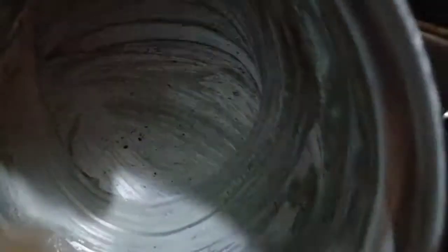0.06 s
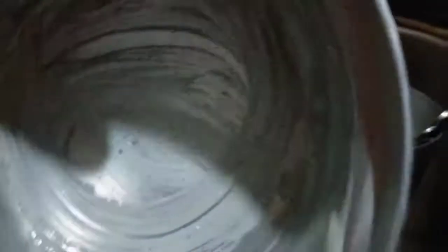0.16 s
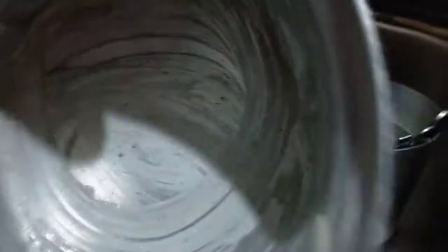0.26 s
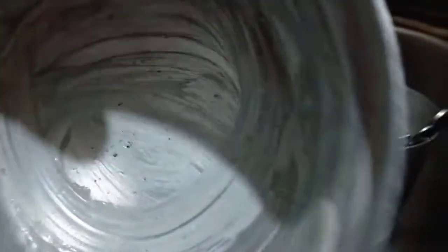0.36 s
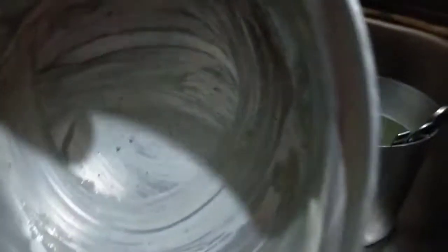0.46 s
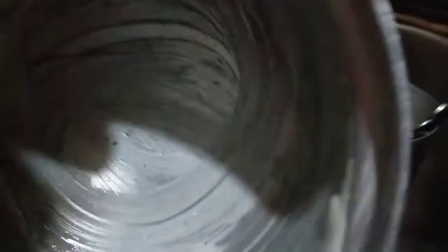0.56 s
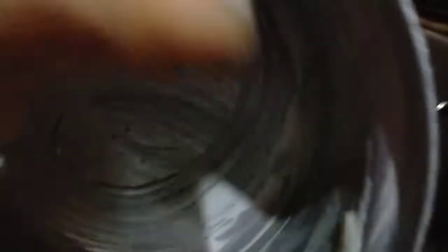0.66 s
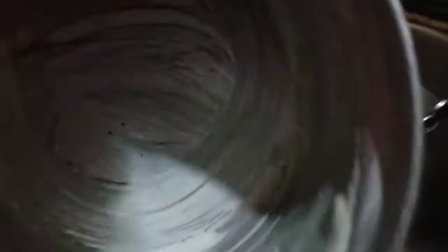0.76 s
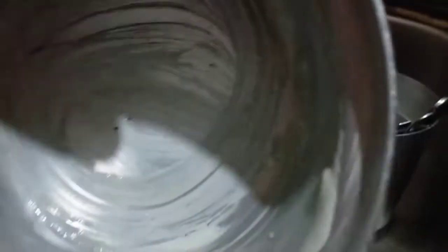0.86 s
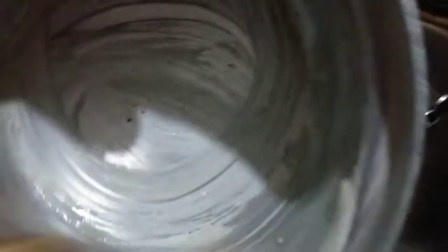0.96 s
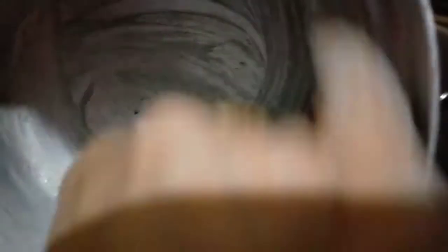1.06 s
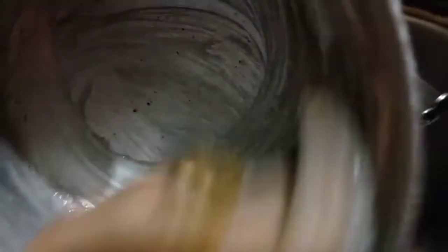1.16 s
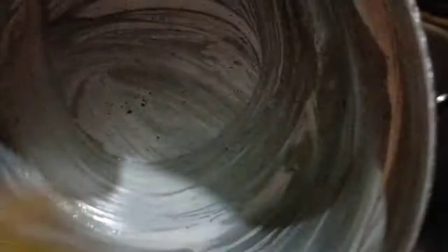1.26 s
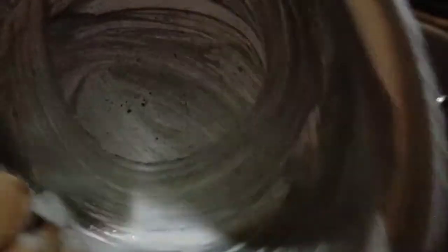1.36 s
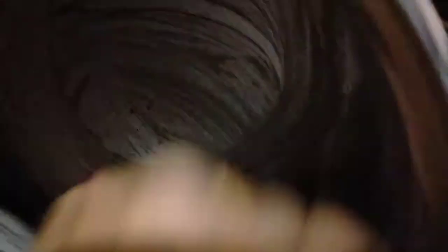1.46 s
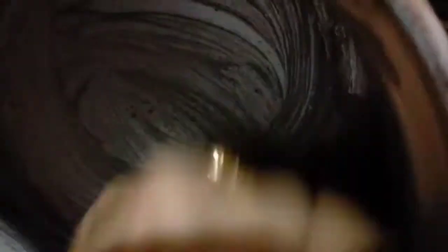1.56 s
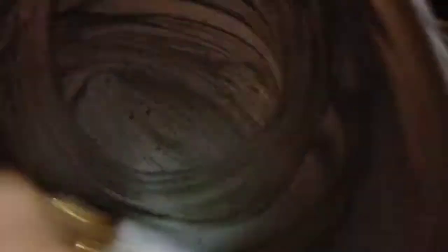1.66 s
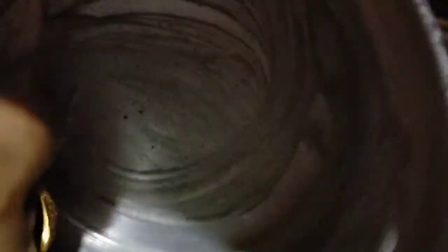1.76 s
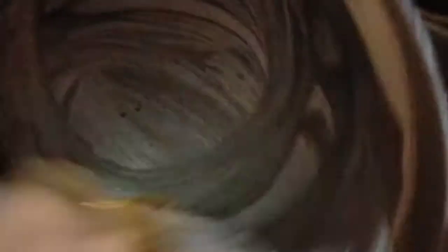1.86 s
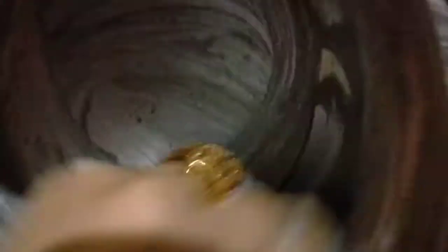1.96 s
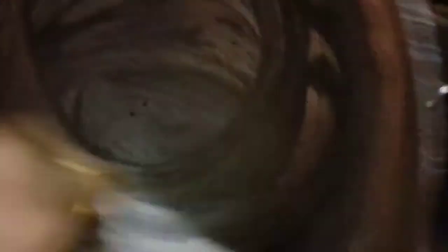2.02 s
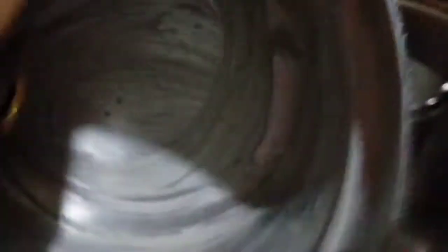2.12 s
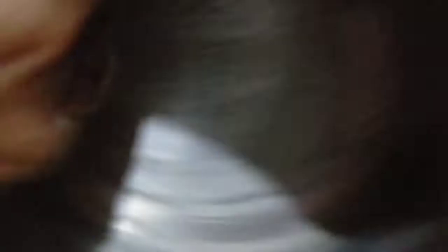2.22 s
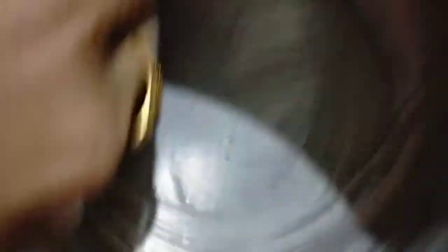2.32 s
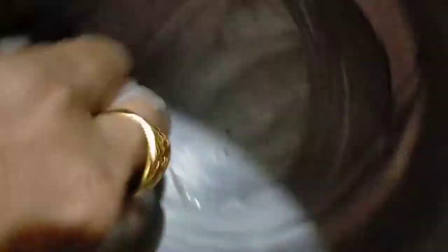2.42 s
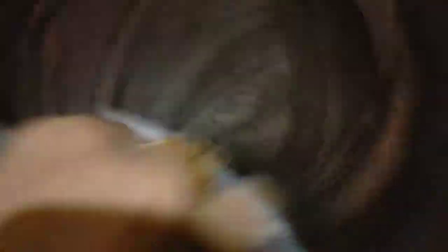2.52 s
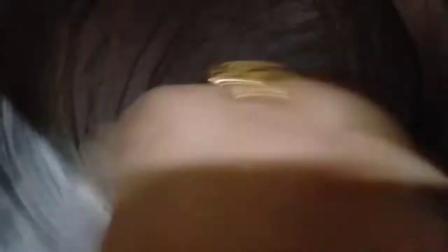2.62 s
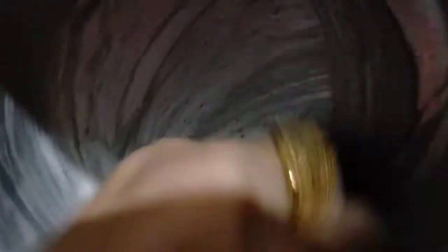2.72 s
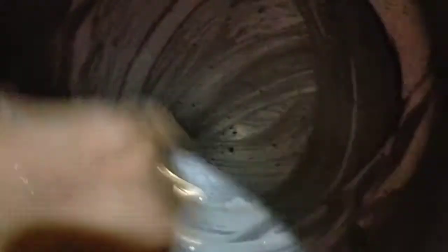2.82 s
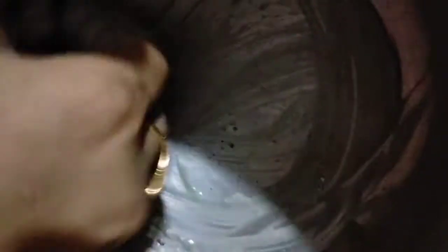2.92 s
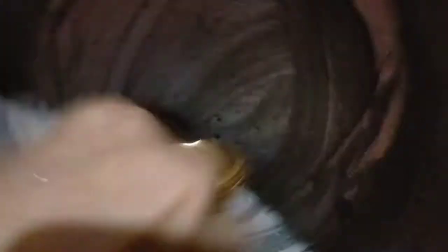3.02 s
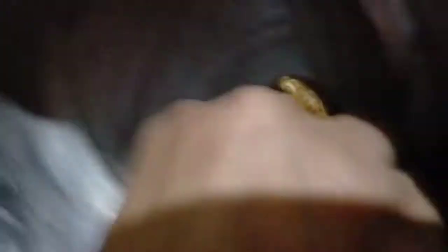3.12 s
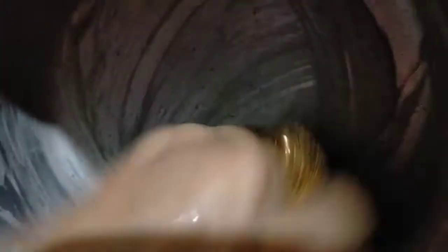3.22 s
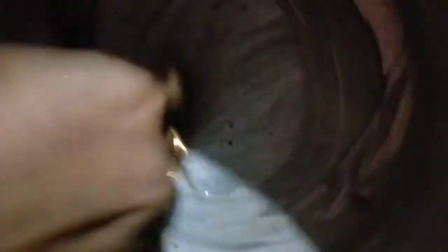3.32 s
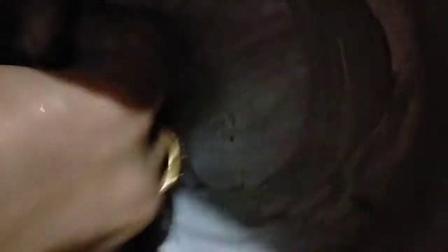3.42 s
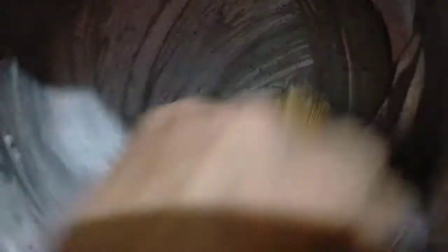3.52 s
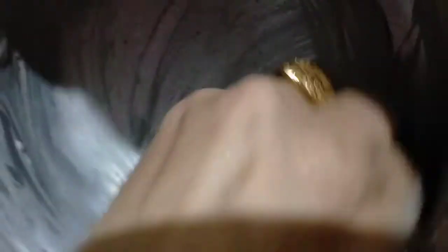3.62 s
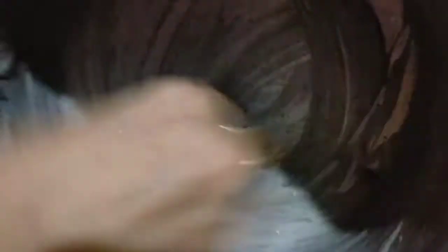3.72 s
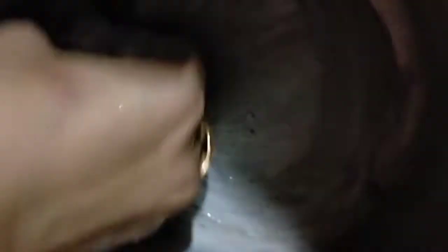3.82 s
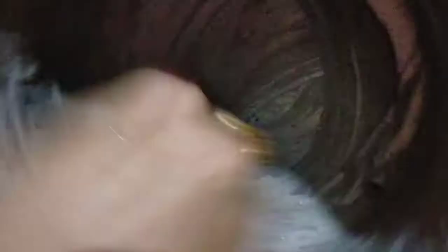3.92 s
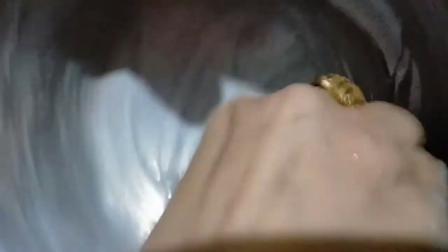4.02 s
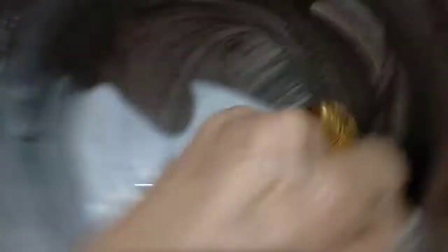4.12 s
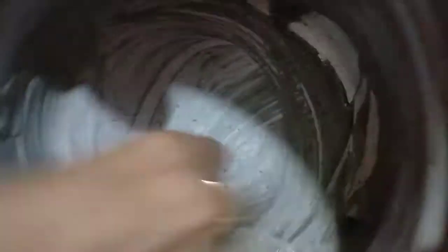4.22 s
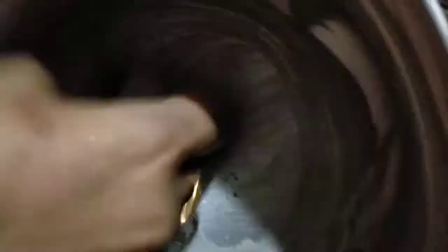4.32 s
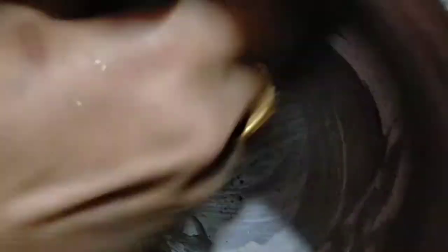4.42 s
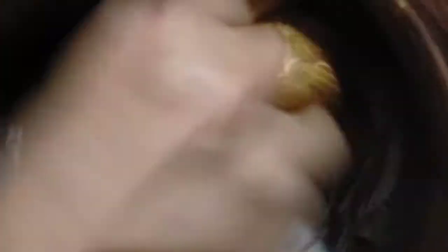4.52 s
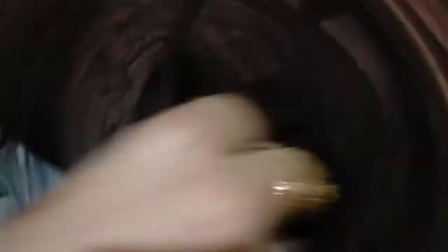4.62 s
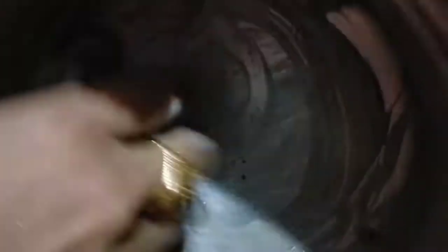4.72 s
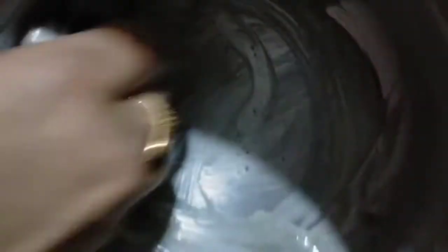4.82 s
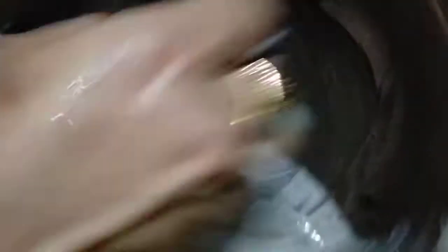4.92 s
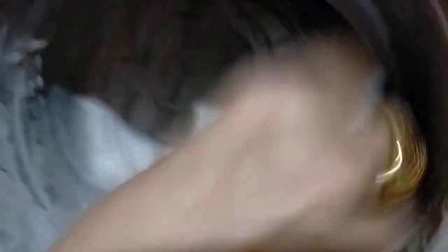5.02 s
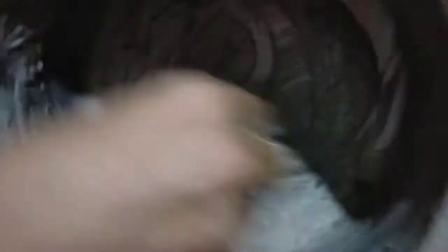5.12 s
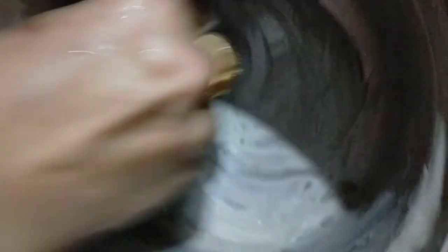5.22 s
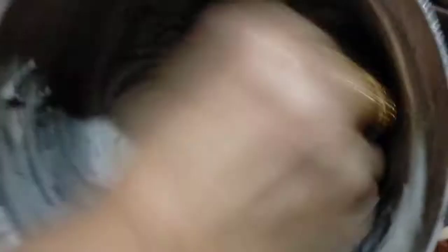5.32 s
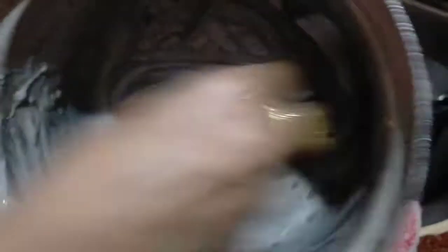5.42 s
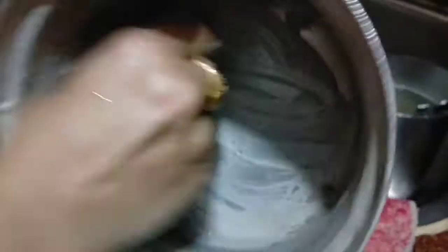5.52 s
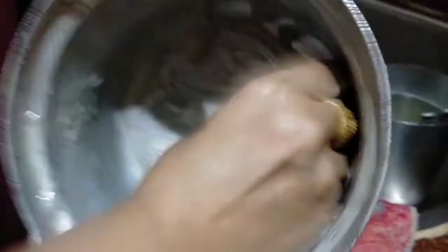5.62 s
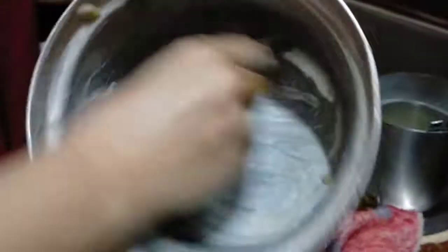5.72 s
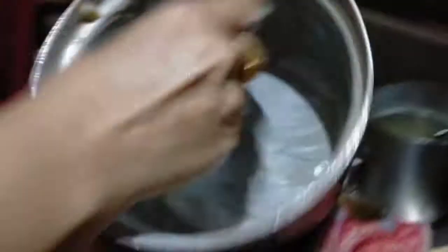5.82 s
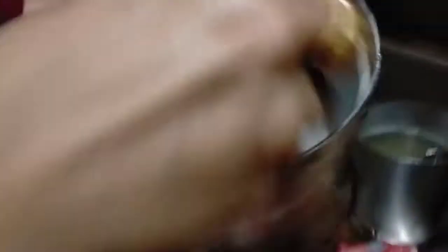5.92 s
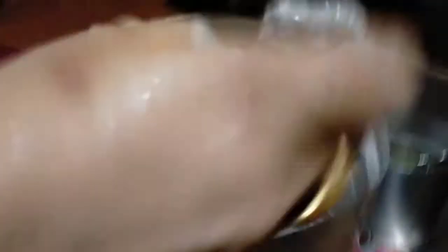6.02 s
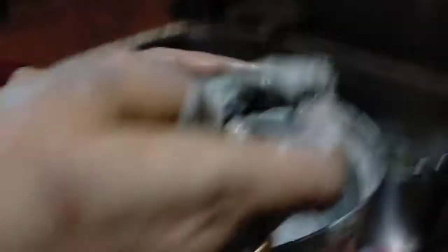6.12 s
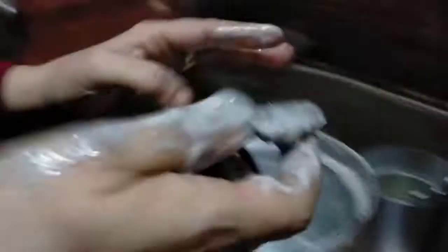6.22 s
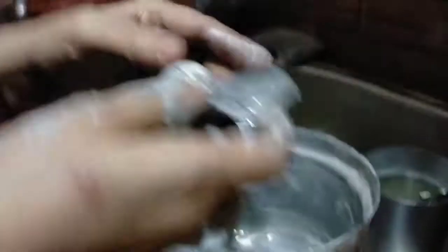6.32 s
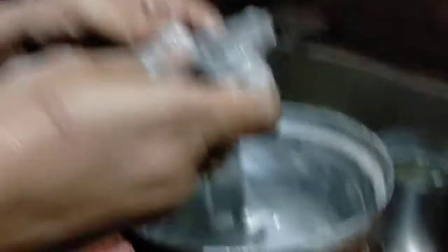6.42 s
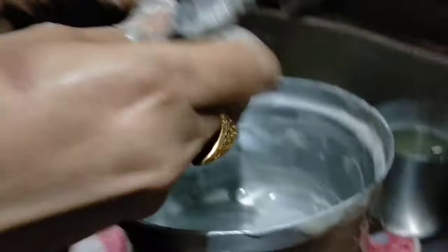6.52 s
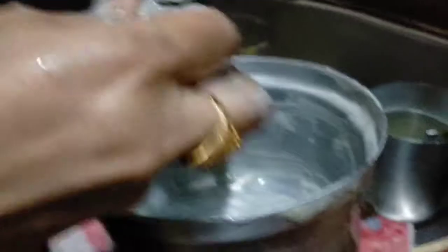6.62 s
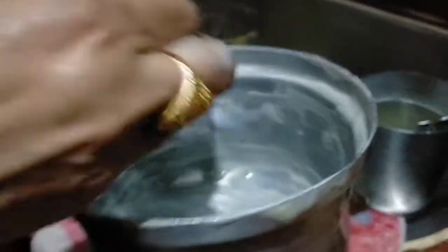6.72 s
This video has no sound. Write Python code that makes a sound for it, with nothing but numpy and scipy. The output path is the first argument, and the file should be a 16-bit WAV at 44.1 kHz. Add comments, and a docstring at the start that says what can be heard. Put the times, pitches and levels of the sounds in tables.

```python
"""In a small, hard kitchen, a soapy steel-wool pad scours the inside of a metal pot close by, stroke on stroke.
Countless wire tips catch and slip: random clicks that hiss and drive the wall, the base and the air in the pot.
On the way the pot clinks, knocks and bumps, made of short decaying tones, scrapes and rumble.
Near the end the pad is lifted out with faint crackles and wet smacks, and a low kitchen hum remains."""
import sys
import numpy as np
from scipy import signal
from scipy.fft import rfft, irfft, next_fast_len
from scipy.io import wavfile
from scipy.ndimage import uniform_filter1d, map_coordinates

SR = 44100
rng = np.random.default_rng(int(sys.argv[2]) if len(sys.argv) > 2 else 0)


def store_wav(level_fs):
    """Save 16-bit WAV to argv[1]."""
    pcm = np.round(np.clip(np.atleast_2d(level_fs), -1, 1) * 32767)
    wavfile.write(sys.argv[1], SR, pcm.T.astype(np.int16))


N = 298539

# colour of the wires' sound: (frequency [Hz], relative level [dB per Hz])
WIRE_COLOUR = [(2600, -35), (4300, -6.5), (4900, -11), (5800, -7), (6500, -4.5), (7300, -3), (8400, 0.5),
               (10000, -0.5), (11000, -6), (12100, -6), (13200, -4), (15200, 1.5), (15800, -6.5)]


def amp(db):
    """Turn decibels into a gain."""
    return 10 ** (np.asarray(db) / 20)


def unit(x):
    """Scale a sound to rms 1."""
    return x / np.sqrt(np.mean(x ** 2) + 1e-20)


def curves(rows):
    """Join the rows with straight lines: one value per sample for each column after the time."""
    s, *cols = np.transpose(rows)
    return [np.interp(np.arange(N) / SR, s, c) for c in cols]


def wobble(rate):
    """A smooth random curve through `rate` random points a second."""
    points = rng.standard_normal(int(N * rate / SR) + 4)
    return map_coordinates(points, [np.arange(N) * rate / SR])


def filtered(x, response):
    """Multiply the spectrum of x by a response that depends on frequency."""
    m = next_fast_len(N + SR // 2)
    hz = np.fft.rfftfreq(m, 1 / SR)
    return irfft(rfft(x, m) * response(hz), m)[..., :N]


def coloured(x, points):
    """Shape x with a filter that never acts ahead of time, from (Hz, dB) points; the result has rms 1."""
    f, db = np.transpose(points)
    hz = np.fft.rfftfreq(SR // 10, 1 / SR)
    gain = amp(np.interp(np.log(hz + 1), np.log(f), db))
    # folding the cepstrum gives the minimum-phase filter with this gain
    cepstrum = irfft(np.log(gain))
    half = len(cepstrum) // 2
    cepstrum[1:half] *= 2
    cepstrum[half + 1:] = 0
    impulse = irfft(np.exp(rfft(cepstrum)))
    return unit(signal.fftconvolve(x, impulse)[:N])


def resonance(hz, centre_hz, width_hz):
    """Response of one mode, which rings at its centre and dies sooner the wider it is."""
    return 1j * hz * width_hz / (centre_hz ** 2 - hz ** 2 + 1j * hz * width_hz)


def soft(hz, edge_hz, order):
    """Gain of a smooth low-pass, one half at the edge."""
    return 1 / (1 + (hz / edge_hz) ** order)


def fade(t, t60):
    """Exponential decay, 60 dB down at t60 seconds."""
    return np.exp(-np.log(1000) * t / t60)


def add(track, s, sound):
    """Mix a sound into a track at s seconds."""
    part = track[round(s * SR):][:len(sound)]
    part += sound[:len(part)]


def echoes(x, t60, hop_count=2048):
    """A dense tail of about the energy of x; the moving hand keeps changing its pattern."""
    t = np.arange(int(SR * min(t60, .5)) + 64) / SR
    window = signal.get_window("hann", 2 * hop_count)
    padded, out = np.pad(x, (0, 2 * hop_count)), np.zeros(N)
    # overlapping slices of x, each with a fresh random tail
    for start in range(0, N, hop_count):
        piece = padded[start:][:len(window)] * window
        tail = rng.standard_normal(SR)[:len(t)] * fade(t, t60) * (t > 0)
        add(out, start / SR, signal.fftconvolve(piece, tail / np.linalg.norm(tail)))
    return out


def in_pot(x, wet_db, t60):
    """Sound bounces round inside the pot: echoes join the direct sound, at rms 1."""
    return unit(x + amp(wet_db) * echoes(x, t60))


def slips(rate, spread_db, clump_db):
    """Wire tips let go at random, rate a second; tangles of wire let go in clumps."""
    happens = rng.random(N) < rate / SR
    size = rng.standard_normal(N) * amp(spread_db * rng.standard_normal(N))
    clumps = amp(clump_db * wobble(260))
    # the root of the rate keeps dense slips from growing louder than sparse ones
    return unit(happens * size / np.sqrt(rate) * clumps)


def arc(s, length):
    """Progress 0-1 through a stroke, and the pad's speed: from rest, over a peak, back to rest."""
    u = np.clip((np.arange(N) / SR - s) / length, 0, 1)
    moving = (u > 0) & (u < 1)
    return u, np.abs(np.sin(np.pi * u)) * moving


def stroke_gains():
    """Gains of hiss, wall and hollow: each swells with speed and pressure, and drags on through the turns."""
    # pushes of the pad: (start [s], length [s], wire hiss before its trim [dB],
    # rise of pressure from start to end [dB], wall ring over the hiss [dB],
    # hollow over the hiss before their trims [dB])
    strokes = [(-0.028, 0.12, -36.5, -4.5, -7, -11.5), (0.101, 0.16, -34, 1.5, -9, -16),
               (0.246, 0.2, -35.5, 4, -7.5, -13.5), (0.504, 0.18, -33.5, -9, -8, -13),
               (0.623, 0.16, -37.5, 12, -6, -13.5), (0.806, 0.41, -35.5, -1, -8, -16),
               (1.098, 0.11, -40.5, -1, 0, -10.5), (1.224, 0.16, -34, 4, -5.5, -10),
               (1.424, 0.17, -34.5, -1, -3, -12.5), (1.592, 0.23, -33, 1.5, -7, -12.5),
               (1.843, 0.14, -35.5, -1.5, -1, -11), (2.01, 0.31, -39.5, -10.5, -6.5, -10),
               (2.394, 0.16, -45.5, -6, -4, -9), (2.517, 0.2, -39.5, -5.5, -6.5, -12.5),
               (2.727, 0.24, -37, 4, -5, -11.5), (2.981, 0.092, -43.5, -7, 4.5, -7.5),
               (3.002, 0.2, -37.5, 1.5, -6, -11.5), (3.228, 0.2, -36, 9.5, -4.5, -12),
               (3.477, 0.21, -36, 0, -4.5, -13), (3.706, 0.2, -33.5, 8, -5, -13.5),
               (3.929, 0.2, -37, 7, -1, -13.5), (4.135, 0.24, -39, 14.5, -4.5, -9),
               (4.263, 0.36, -39.5, -4, -3.5, -11.5), (4.658, 0.044, -51, 3, -4, -20),
               (4.728, 0.056, -39.5, -10, -10.5, -21), (4.79, 0.2, -45, -5.5, -0.5, -12.5),
               (5.069, 0.23, -35.5, 5.5, -4, -15), (5.287, 0.15, -32.5, -4.5, -6.5, -20),
               (5.473, 0.097, -28.5, -10, -7, -18.5), (5.601, 0.11, -31, 2.5, -7.5, -17.5),
               (5.727, 0.11, -32.5, -4.5, -3, -15.5)]
    # how the layers grow with the pad's speed: (power for hiss, for wall ring, for hollow)
    speed_law = (0.66, 0.36, 0.3)
    drag_db, drag_s = -10, 0.17  # the pad never quite stops at a turn: level under the strokes, reach
    give_s = .02  # the springy wool rounds off every start and stop
    power = np.zeros((3, N))
    for s, length, db, press_db, wall_db, hollow_db in strokes:
        u, speed = arc(s, length)
        on = speed > 0
        pressed_db = db + press_db * (u[on] - .5)
        for layer, over_db, law in zip(power, (0, wall_db, hollow_db), speed_law):
            layer[on] += (amp(pressed_db + over_db) * speed[on] ** law) ** 2
    drag = np.abs(uniform_filter1d(power, max(int(drag_s * SR), 1), axis=1))
    gains = np.sqrt(power + amp(drag_db) ** 2 * drag)
    return np.abs(uniform_filter1d(gains, max(int(give_s * SR), 1), axis=1))


def wire_hiss(drive):
    """The wires themselves hiss, brightest while their tips bite."""
    # fine wire tips against flattened wool: (time [s], top treble boost or cut [dB])
    sharpness = [(0, 1.5), (1, 1), (2, 1.5), (3, 1), (4.1, 2), (4.8, -2.5), (5.4, -3.5), (5.8, -6.5)]
    wires = coloured(in_pot(drive, wet_db=-2.0, t60=0.035), WIRE_COLOUR)
    tips = filtered(wires, lambda hz: 1 - soft(hz, edge_hz=9350, order=10))
    return wires + (amp(curves(sharpness)[0]) - 1) * tips


def wall_ring(drive):
    """The pot wall: a broad, hand-damped hump with a few narrow modes on top."""
    # narrow modes of the wall that sing under the pad: (frequency [Hz], width [Hz], relative level [dB])
    wall_modes = [(1570, 130, -3.5), (2710, 290, -7.5), (3170, 170, 4.5), (3360, 150, 11), (3900, 71, -4)]
    # colour of the broad hump: (frequency [Hz], relative level [dB per Hz])
    wall_colour = [(1240, -50.5), (2100, -12), (2600, -2), (2770, -3), (3250, 1.5), (3680, -5.5),
                   (4000, -5.5), (4900, -12), (6370, -65), (10800, -120)]

    def modes_response(hz):
        total = 0
        for k, (f, width, db) in enumerate(wall_modes):
            total = total + (-1) ** k * amp(db) * resonance(hz, f, width)  # signs alternate
        return total

    shaking = echoes(drive, t60=0.026)
    ring = unit(filtered(shaking, modes_response))
    hump = coloured(in_pot(drive, wet_db=-5.5, t60=0.02), wall_colour)
    return unit(hump + amp(-7.5) * ring)


def hollow_air(drive):
    """The air in the pot booms, and changes colour as the pad moves between side wall and base."""
    # where the pad rubs: (time [s], place from 0 on the side wall to 1 on the base)
    place = [(2.2, 0), (2.8, 0.81), (4.5, 1), (5.2, 0.82)]
    # the hollow driven from the side wall: (frequency [Hz], relative level [dB per Hz])
    side_colour = [(120, -34), (300, -3.5), (450, -2.5), (600, 3.5), (830, -8.5), (1150, -1), (1380, 2),
                   (1620, 6.5), (1900, 1.5), (2200, 2), (2700, -3.5), (4000, -64)]
    # the hollow driven from the base: (frequency [Hz], relative level [dB per Hz])
    bottom_colour = [(120, -41.5), (300, -7), (460, -8.5), (630, 3.5), (850, -10), (1100, -0.5), (1300, 0),
                     (1430, 2), (1560, 2.5), (1750, -6.5), (2200, -3), (2700, -18), (4000, -54)]
    on_base = np.clip(curves(place)[0], 0, 1)
    from_side = coloured(echoes(drive, t60=0.089), side_colour)
    from_base = coloured(in_pot(drive, wet_db=-0.5, t60=0.073), bottom_colour)
    return np.sqrt(1 - on_base) * from_side + np.sqrt(on_base) * from_base


def singing_base(drive):
    """The pad sweeps over the base and makes one of its modes sing."""
    # sweeps over the base: (start [s], length [s], level at full speed [dB])
    base_sweeps = [(2.755, 0.12, -58), (3.246, 0.12, -44.5), (3.52, 0.084, -60), (3.748, 0.12, -40),
                   (4.022, 0.11, -47.5), (4.196, 0.27, -41.5), (4.443, .15, -55)]
    sweep_law = 2.3  # power of the pad's speed that the base follows
    note = unit(filtered(drive, lambda hz: resonance(hz, centre_hz=1202, width_hz=99) ** 2))
    gain = sum(amp(db) * arc(s, length)[1] ** sweep_law for s, length, db in base_sweeps)
    return gain * note


def scouring():
    """A faster stroke tears more wires loose; the same slips hiss and shake the pot."""
    hiss_gain, wall_gain, hollow_gain = stroke_gains()
    pace = np.sqrt(hiss_gain / hiss_gain.max())  # 0-1, taken from the strength of the hiss
    grip = amp(0.49 * wobble(35))  # the pad judders a little under the hand
    drive = grip * slips(6000 + 22000 * pace, spread_db=0.75, clump_db=0.43)
    pot = amp(1.03) * hiss_gain * wire_hiss(drive)
    pot += wall_gain * wall_ring(drive)
    pot += amp(1.5) * hollow_gain * hollow_air(drive)
    return pot + singing_base(drive)


def kitchen():
    """Slightly unsteady hum tones over steady room noise and a low, uneven handling rumble."""
    # hum: (frequency [Hz], middle level [dB rms])
    hum_tones = [(46, -65.5), (101, -65.5), (347, -67)]
    # colour of the room noise: (frequency [Hz], relative level [dB per Hz])
    air_colour = [(20, -18), (110, -30), (200, -13.5), (280, -13), (350, -10.5), (480, -18), (800, -21),
                  (1150, -18.5), (2200, -17), (3300, -19), (4900, -33.5), (8000, -28.5), (15800, -41)]
    t = np.arange(N) / SR
    hum = np.zeros(N)
    for hz, db in hum_tones:
        level = np.sqrt(2) * amp(db + 3.4 * wobble(4.08))
        hum += level * np.sin(2 * np.pi * hz * t + 0.96 * wobble(11))
    air = amp(-58.5) * coloured(rng.standard_normal(N), air_colour)
    low_colour = [(20, -2), (50, -7), (110, -7.5), (250, -15.5), (800, -44)]  # (Hz, dB per Hz)
    handling = amp(-58.5 + 1.4 * wobble(5.8)) * coloured(rng.standard_normal(N), low_colour)
    return hum + air + handling


def blow(modes, t60, attack, scrape_db, scrape_t60):
    """One contact rings the modes at slightly new strengths and grinds for an instant."""
    t = np.arange(SR // 2) / SR
    ring = np.zeros(len(t))
    for hz, db, share in modes:
        strength = amp(db + rng.normal(0, 1))
        ring += strength * fade(t, t60 * share) * np.sin(2 * np.pi * (hz * t + rng.random()))
    scrape = amp(scrape_db) * fade(t, scrape_t60) * rng.standard_normal(len(t))
    return ring * (1 - np.exp(-t / attack)) + scrape


def contacts():
    """Soft knocks ring only the pot's low modes; hard metal contacts ring the high ones."""
    # hard metal contacts inside the pot: (time [s], level [dB], t60 before each mode's share [s])
    clinks = [(2.382, -43, 0.019), (2.405, -42, 0.024), (4.738, -34, 0.053), (4.832, -40.5, 0.035),
              (5.399, -11, 0.016), (4.048, -30.5, 0.02), (4.325, -30.5, 0.046)]
    # what a clink rings with: (frequency [Hz], relative level [dB], t60 share [ratio])
    metal_modes = [(3172, 0, 1.8), (3460, -4, .9), (3903, -0.5, 1.13), (4270, 3.5, 0.33), (5130, -22, 1.5),
                   (6000, -17, 1.5), (6570, -3, 0.63), (8070, -1.5, 0.95), (8220, -7.5, 0.88),
                   (8540, 4, 0.59)]
    # the pot knocks on its support: (time [s], level [dB], t60 before each mode's share [s],
    # edge above which the contact excites little [Hz])
    knocks = [(4.737, -32.5, 0.061, 1370), (5.071, -20.5, 0.042, 400), (5.398, -31, 0.095, 1423),
              (5.48, -42.5, 0.26, 900), (5.683, -21, 0.064, 1605)]
    # what the knocked pot rings with: (frequency [Hz], level before the contact's edge [dB],
    # t60 share [ratio])
    pot_modes = [(283, -8.5, 0.68), (380, -8.5, 0.98), (531, -9, 1.6), (580.4, 0, 1.3), (630, -6, .8),
                 (778, -4, 0.56), (973, -11.5, 0.83), (1470, -4.5, 0.48)]
    track = np.zeros(N)
    for s, db, t60 in clinks:
        clink = blow(metal_modes, t60, attack=0.00058, scrape_db=-8.0, scrape_t60=0.024)
        add(track, s, amp(db) * clink)
    for s, db, t60, edge_hz in knocks:
        modes = []
        for hz, level, share in pot_modes:
            softened = level + 20 * np.log10(soft(hz, edge_hz, order=4))
            modes.append((hz, softened, share))
        knock = blow(modes, t60, attack=0.0011, scrape_db=-19.5, scrape_t60=0.057)
        add(track, s, amp(db) * knock)
    return track


def bumps():
    """The whole pot rocks on its support with one low, damped note and a short rumble."""
    # dull bumps as the pot is shifted: (time [s], level [dB], frequency [Hz], t60 [s])
    shifts = [(2.405, -26.5, 100.6, 0.23), (4.58, -43, 201, 0.063), (5.399, -43, 132, .12),
              (5.52, -40, 86, .15), (5.695, -35.5, 106, 0.12), (6.127, -35.5, 80, 0.18),
              (6.388, -43, 64, .14)]
    rock, shake, t = np.zeros(N), np.zeros(N), np.arange(SR // 2) / SR
    for s, db, hz, t60 in shifts:
        push = amp(db) * (1 - np.exp(-t / .002)) * fade(t, t60)
        add(rock, s, push * np.sin(2 * np.pi * hz * t))
        add(shake, s, push)
    rumble_colour = [(25, 6), (60, -10.0), (200, -0.5), (280, -24.0), (900, -28), (3000, -66)]  # (Hz, dB per Hz)
    rumble = coloured(rng.standard_normal(N), rumble_colour)
    return rock + amp(-10.5) * shake * rumble


def wet_pad():
    """Lifted out, the pad crackles faintly and smacks in the fingers: fading bursts of wire and foam slips."""
    # squeezes of the pad: (time [s], wire level [dB], foam level [dB], t60 [s])
    squeezes = [(5.85, -69, -66, 0.18), (5.89, -63, -57, 0.26), (6.1, -60.5, -66, 0.35),
                (6.177, -55, -75, .08), (6.206, -57, -68, 0.22), (6.476, -52, -47, 0.2)]
    # colour of the foam: (frequency [Hz], relative level [dB per Hz])
    foam_colour = [(500, -13), (1000, -4), (2500, -2), (4100, 1), (5500, -10), (8500, 2), (15000, -22)]
    wire, lather, t = np.zeros(N), np.zeros(N), np.arange(SR // 2) / SR
    for s, wire_db, foam_db, t60 in squeezes:
        add(wire, s, amp(wire_db) * fade(t, t60))
        add(lather, s, amp(foam_db) * fade(t, t60))
    bursts = slips(2500, spread_db=3, clump_db=2.5)
    froth = slips(9000, spread_db=2, clump_db=1)
    return wire * coloured(bursts, WIRE_COLOUR) + lather * coloured(froth, foam_colour)


def scene():
    """The pot close by in a small, hard kitchen; both channels hear the same."""
    rubbing = scouring() + wet_pad()
    hits = contacts()
    # the room answers the hits more than the rubbing
    room = echoes(amp(-6.5) * hits + amp(-18) * rubbing, t60=.28)
    mono = hits + rubbing + bumps() + room + kitchen()
    return np.array([mono, mono])


def record(dry):
    """Nothing is kept above the band limit."""
    top_hz = 15780
    return filtered(dry, lambda hz: hz < top_hz)


dry = scene()
out = record(dry)
store_wav(out)
```